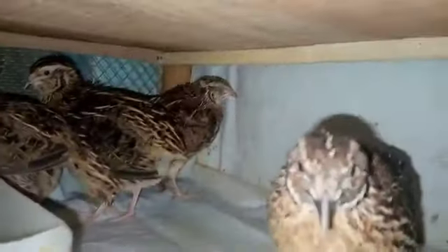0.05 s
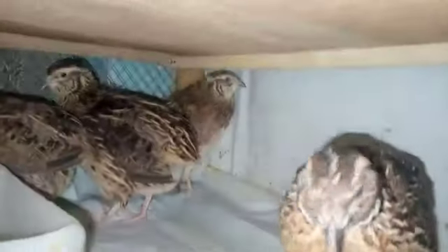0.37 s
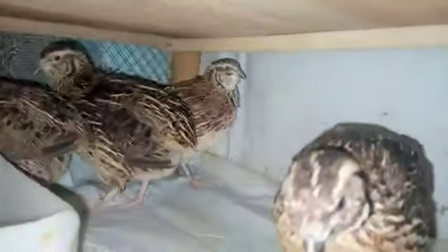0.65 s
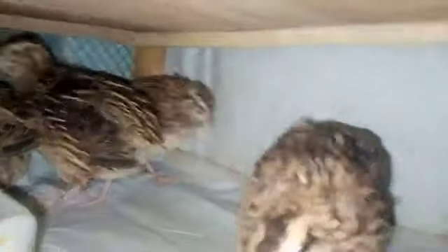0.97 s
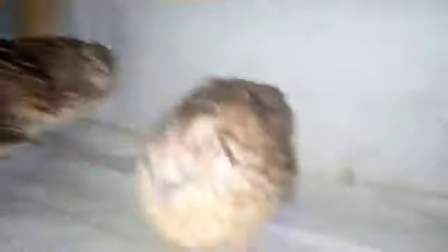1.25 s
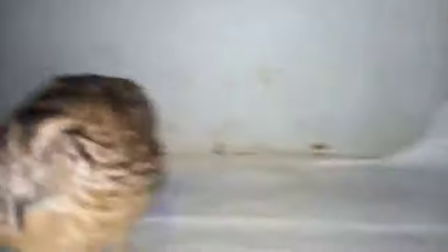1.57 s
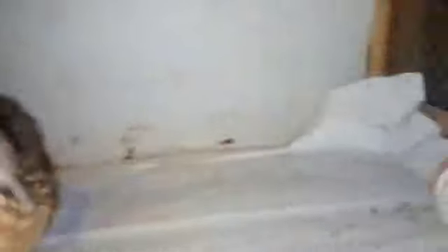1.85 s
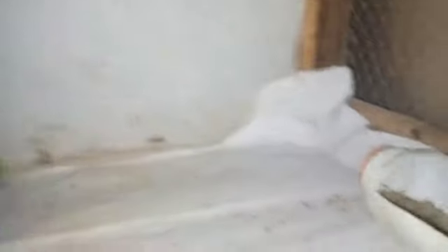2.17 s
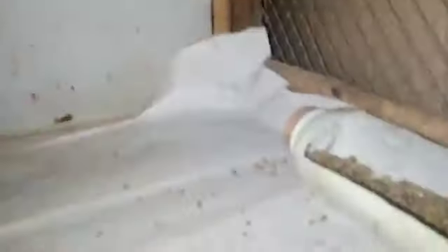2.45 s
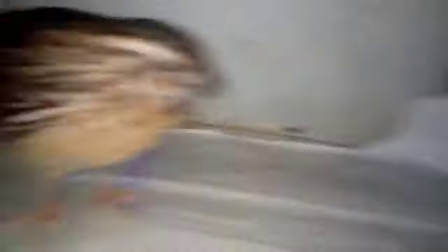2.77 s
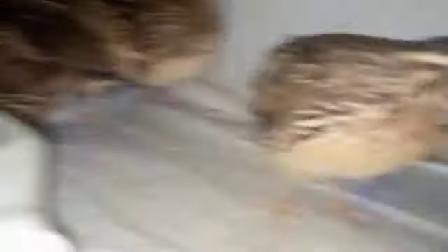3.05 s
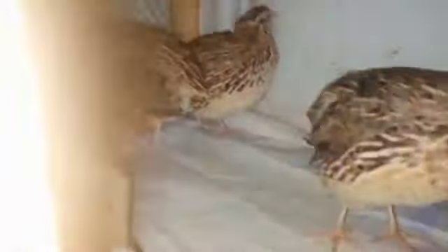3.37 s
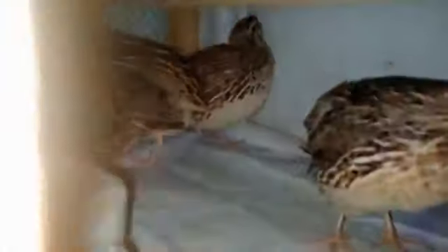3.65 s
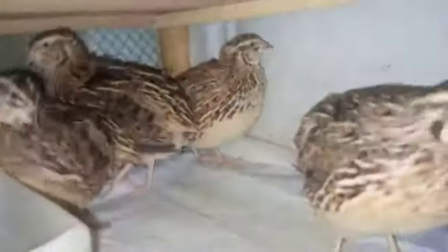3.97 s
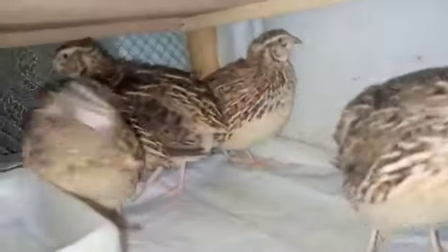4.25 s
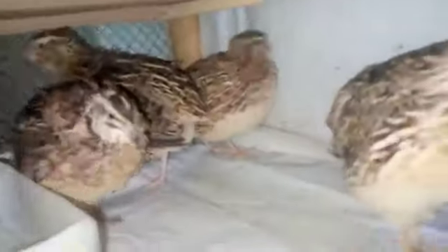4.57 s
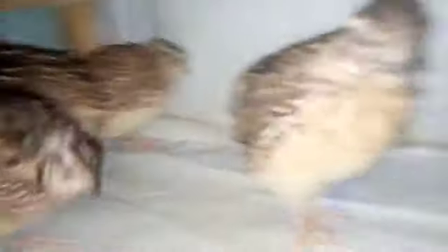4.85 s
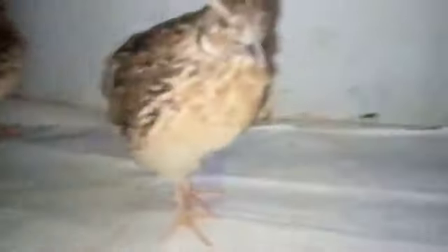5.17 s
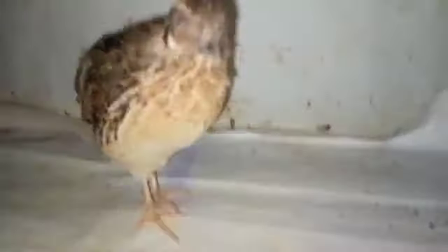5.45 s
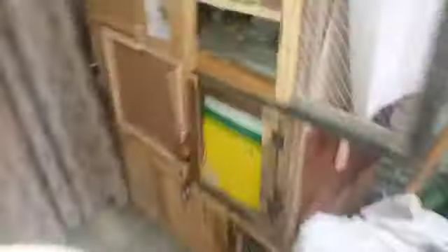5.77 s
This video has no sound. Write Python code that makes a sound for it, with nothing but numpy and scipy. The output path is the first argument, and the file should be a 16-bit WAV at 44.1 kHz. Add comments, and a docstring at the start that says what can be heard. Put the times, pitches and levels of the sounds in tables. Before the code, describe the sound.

Chicks give high, falling peeps indoors behind the scuffs, thuds and bowl taps of shuffling quail and the pops of a hand-held phone.

```python
"""A wooden hutch: quail shuffle about, a hand-held phone among them.
The phone's case pops in stick-slip, rubs, rumbles and judders in the hand. Close by, feet and
feathers scuff the liner, the floor board thuds, beaks and claws knock a metal bowl, and one bird
gives a low coo. Across the room chicks tweet and peep, each peep a falling glide from both sides
of the syrinx."""
import sys
import numpy as np
from scipy import signal
from scipy.fft import rfft, irfft
from scipy.io import wavfile

SR = 44100
rng = np.random.default_rng(int(sys.argv[2]) if len(sys.argv) > 2 else 0)


def int16_out(signal):
    """Quantize to a 16-bit WAV file."""
    q = np.round(np.clip(np.atleast_2d(signal).T, -1, 1) * 32767)
    wavfile.write(sys.argv[1], SR, q.astype(np.int16))


N = 260631
TIME_S = np.arange(N) / SR

# handling rumble: time_s, level_db
RUMBLE_LEVELS = [(0.0, -48), (0.81, -56.5), (1.12, -48), (1.68, -56), (2.11, -43), (2.32, -54.5),
                 (4.92, -53.5), (5.91, -63.5)]
# rubbing, three registers: time_s, body_db, rasp_db, hiss_db
RUSTLE_LEVELS = [(0, -57.5, -55.5, -54.5), (.35, -45.5, -56, -62.5), (.43, -47, -52, -49),
                 (.56, -70, -57.5, -57), (.62, -71.5, -76, -82), (.83, -62, -78, -74.5),
                 (.93, -53, -61, -57), (1.09, -48.5, -53.5, -47.5), (1.3, -51.5, -53, -55.5),
                 (1.52, -50.5, -56, -57.5), (1.7, -56.5, -47, -46.5), (1.79, -64, -55, -50),
                 (1.861, -45.5, -39, -42), (1.95, -72, -58, -61), (2.01, -59, -60, -38.5),
                 (2.05, -42, -39.5, -74), (2.15, -37, -39.5, -50), (2.36, -60, -53, -55),
                 (2.6, -57.5, -50, -52.5), (2.72, -50.5, -52.5, -52), (2.9, -58, -46.5, -45.5),
                 (2.98, -61.5, -60, -63), (3.14, -73.5, -71.5, -85), (3.44, -64.5, -71.5, -68.5),
                 (3.74, -72, -67, -64), (3.83, -47.5, -72, -49.5), (3.98, -49, -51, -59),
                 (4.2, -60.5, -65, -56), (4.36, -52.5, -62.5, -45.5), (4.58, -63.5, -75, -70),
                 (4.73, -63.5, -66, -58), (4.86, -48, -59, -45), (5.06, -55.5, -58, -57),
                 (5.22, -74, -45, -66), (5.37, -73, -48.5, -75), (5.46, -58, -40.5, -46.5),
                 (5.62, -62.5, -46, -47), (5.74, -75, -56, -46), (5.91, -44.5, -46, -54)]
# feet and feathers: start_s, length_s, level_db, brightness (0 body, 1 rasp, 2 hiss)
FOOT_SCUFFS = [(0.32, 0.023, -36.5, 1.37), (0.345, 0.035, -37.5, 2.05), (.407, 0.015, -37, 1.7),
               (.537, 0.058, -45, 0.051), (0.902, 0.007, -42.5, 2.34), (2.17, 0.031, -49, 0.36),
               (2.495, 0.0059, -41.5, 2.1), (2.567, 0.0079, -43, 0.97), (2.1015, 0.0087, -22, 1.21),
               (2.664, 0.011, -33, 1.84), (3.366, 0.0094, -54.5, 0.65), (3.431, 0.019, -51.5, 1.06),
               (3.504, .025, -59.5, 1.24), (3.668, 0.027, -56.5, 0.61), (3.861, 0.03, -43, 0.43),
               (4.322, 0.051, -36.5, 2.58), (4.377, 0.058, -38.5, 2.32), (4.462, 0.032, -33, 2.6),
               (4.8, 0.045, -40.5, 1.52), (4.878, 0.058, -37.5, 1.84), (4.929, 0.036, -22.5, 1.08),
               (4.992, 0.031, -33, 1.1), (5.089, 0.038, -43.5, 0.67), (5.758, 0.041, -43, 0.95),
               (5.841, 0.044, -40, 0.51), (5.87, 0.036, -34.5, 2.6)]
# hand sliding on the phone: start_s, length_s, level_db
HAND_SLIDES = [(0.711, 0.039, -48.5), (0.998, 0.27, -47.5), (1.152, 0.39, -54.5), (1.45, 0.12, -47.5),
               (1.66, 0.63, -51.5), (2.563, 0.22, -59.5), (2.815, 0.16, -55.5), (5.007, 0.1, -54)]
# spectra of rumble, rubbing registers, skin and case: freq_hz, gain_db
RUMBLE_EQ = [(25, -17.5), (50, 2.5), (80, 10), (170, 6.5), (260, -21.5), (500, -59.5)]
BODY_EQ = [(120, -22.5), (210, 0), (350, 1.5), (550, -4.5), (820, -7), (1100, -42.5), (2500, -44)]
RASP_EQ = [(450, -18), (950, 2), (1400, 3.5), (2200, 2), (3200, 0), (4800, -2.5), (7000, -17), (11000, -55)]
HISS_EQ = [(1500, -32), (3000, -7), (5500, -2.5), (6700, 2.5), (8000, -12), (10000, -19.5), (15000, -32)]
SKIN_EQ = [(4000, -16), (6700, 0.5), (8500, -5), (11000, -12), (13500, -6.5), (14900, 2.5), (15400, -36),
           (16000, -52)]
CASE_EQ = [(100, 0.5), (1000, -3), (2500, 0), (4500, -3), (6800, 4), (8500, -9.5), (12000, -23.5),
           (15000, -11), (16500, -15)]
# stick-slip runs on the case: start_s, slip_count, gap_ms, level_db, release_ms
SLIP_RUNS = [(.0098, 1, 0, -11.5, 0.058), (0.0858, 2, 23, -17.5, 0.072), (0.1467, 2, 43, -8, 0.054),
             (0.2186, 2, 25.5, -15.5, 0.14), (0.293, 2, 20, -13.5, 0.094), (1.3598, 1, 0, -22, 1.7),
             (1.3912, 3, 30.5, -14.5, .9), (1.493, 1, 0, -22, 1.1), (1.676, 2, 12, -20, 0.48),
             (1.698, 3, 7, -17, 0.32), (1.7197, 2, 20.5, -15, 0.84), (1.812, 1, -4, -2.5, 0.03),
             (1.894, 2, 26.5, -16.5, 0.98), (1.9452, 4, 22, -10.5, .2), (2.0373, 2, 24.5, -12.5, 0.079),
             (2.129, 1, 0, -15.5, 0.81), (2.2956, 2, 16, -13.5, 0.72), (2.333, 1, 0, -15, 1.4),
             (2.666, 1, 0, -17.5, 7), (3.946, 1, 0, -6.5, 0.038), (4.0303, 2, 29.5, -5.5, 0.083),
             (4.096, 2, 31.5, -10.5, 0.067), (4.805, 1, 0, -15.5, 0.43), (4.9293, 1, 0, -5, 0.16),
             (4.991, 1, 0, -1.5, 0.13)]
# modes of the hollow case and the loaded bowl: freq_hz, width_hz, gain_db
PHONE_MODES = [(249, 67, -1), (694, 216, 0.5), (1510, 280, -5)]
BOWL_MODES = [(355, 64, 7), (475, 81, 14), (700, 83, 6.5), (1760, 54, -35), (2720, 150, -3.5),
              (3400, 70, -7), (4460, 81, -6), (6600, 540, -7.5)]
# floor thuds: start_s, level_db, pitch_hz, t60_s
FLOOR_BUMPS = [(.203, -27, 390, .05), (0.327, -33, 167.7, 0.19), (0.492, -18, 319, 0.042),
               (.517, -22, 716, 0.032), (1.048, -29.5, 327, 0.15), (1.722, -35, 285, 0.099),
               (2.11, -25.5, 216, 0.23), (3.061, -34, 88, 0.14), (2.921, -28.5, 347, 0.025),
               (2.667, -12.5, 124, 0.043), (3.877, -27, 260, 0.023), (4.635, -20, 335, 0.025),
               (4.949, -13.5, 154, 0.031)]
# bowl contacts: start_s, level_db, tilt_db_per_octave (hardness)
BOWL_KNOCKS = [(0.444, -32, -5), (.492, -28.5, -0.5), (.516, -19.5, 4.5), (0.738, -36, 4.5),
               (1.011, -37.5, -2.5), (2.172, -26, 5.5), (2.931, -34.5, 4), (3.773, -41, 7.5),
               (3.862, -30.5, 7), (4.077, -41, 27), (4.515, -34, 36), (4.629, -37, 47), (4.654, -34.5, 28),
               (4.7065, -31.5, 14), (5.408, -31.5, 2.5), (5.508, -25, 1.5)]
# contact length by hardness: tilt_db_per_octave, contact_ms
CONTACT_TIMES = [(5, 10.2), (-1, 2.7)]
# tweets, finger judder, coo: start_s, length_s, open_hz, middle_hz, close_hz, level_db
TWEET_ARCS = [(.15, 0.098, 4780, 3980, 3520, -52), (.62, 0.075, 4400, 4170, 3900, -76),
              (.925, 0.13, 4500, 3930, 3610, -54), (1.775, 0.15, 4220, 3870, 3630, -44),
              (2.975, 0.034, 3100, 2100, 2300, -59), (3.183, 0.029, 3440, 2895, 2560, -44),
              (3.255, 0.052, 4000, 3050, 2850, -55), (3.80, 0.036, 3100, 2460, 2020, -47),
              (4.755, 0.064, 1990, 3120, 3200, -49.5), (5.183, 0.074, 3790, 3520, 3360, -47.5)]
JUDDER_ARCS = [(1.047, .112, 174, 172, 168, -35)]
COO_ARCS = [(4.843, .066, 305, 258, 272, -36)]
# judder and coo partials: harmonic, level_db
JUDDER_HARMONICS = [(1, 12), (2, -6)]
COO_HARMONICS = [(2, 12.5), (3, 12.5), (4, -8), (5, -3)]
# falling peeps: start_s, length_s, open_hz, knee_hz, close_hz, level_db
PEEP_GLIDES = [(1.082, 0.15, 5250, 4010, 2810, -42.5), (1.172, 0.1, 4390, 4150, 4020, -44.5),
               (1.489, .15, 5110, 4000, 2900, -43.5), (1.559, 0.13, 4910, 4080, 2540, -39.5),
               (2.0, 0.14, 5100, 4040, 2420, -41), (2.436, 0.21, 5046, 3853, 2340, -37.5),
               (2.481, 0.19, 4910, 4050, 3630, -39.5), (2.855, 0.074, 4690, 4120, 3200, -44),
               (2.952, 0.24, 5275, 3970, 2450, -47), (2.985, 0.24, 5640, 4080, 3500, -52.5),
               (3.286, 0.17, 5190, 4190, 2670, -47.5), (3.605, 0.19, 5190, 4190, 3630, -49),
               (3.715, 0.19, 5010, 4090, 2730, -44.5), (4.082, 0.11, 5100, 4240, 3600, -45.5),
               (4.46, 0.13, 4220, 3660, 2530, -48), (4.505, 0.19, 5050, 4280, 3250, -48),
               (5.026, 0.258, 5020, 4010, 2710, -37), (5.493, 0.2, 4850, 4260, 3530, -35),
               (5.53, .16, 5640, 5050, 4700, -38), (5.692, 0.18, 5180, 4230, 4070, -38.5),
               (5.737, .2, 5090, 4380, 3500, -36)]


def undb(db):
    """Decibels to gain."""
    return 10 ** (np.asarray(db) / 20)


def unit(x):
    """Scale to rms 1."""
    return x / np.sqrt(np.mean(x ** 2) + 1e-20)


def add(track, start_s, x):
    """Mix x into the track."""
    i = max(int(start_s * SR), 0)
    track[i:i + len(x)] += x[:max(len(track) - i, 0)]


def ticks(length_s):
    """Sample times, s."""
    return np.arange(int(length_s * SR)) / SR


def stroke(length_s):
    """Rounded rise and fall."""
    return np.sin(np.pi * ticks(length_s) / length_s) ** .5


def walk(rate_hz, size):
    """Random wander: straight lines between unit normal draws."""
    points = rng.standard_normal(int(size * rate_hz / SR) + 2)
    return np.interp(np.arange(size) * rate_hz / SR, np.arange(len(points)), points)


def colour(x, eq):
    """Minimum-phase filter from (freq_hz, gain_db) points."""
    hz, db = np.transpose(eq)
    size = 2 ** 12
    bins_hz = np.maximum(np.fft.rfftfreq(size, 1 / SR), 1)
    gain = undb(np.interp(np.log(bins_hz), np.log(hz), db))
    cepstrum = irfft(np.log(gain))
    cepstrum[1:size // 2] *= 2
    cepstrum[size // 2 + 1:] = 0
    return signal.fftconvolve(x, irfft(np.exp(rfft(cepstrum))))[:len(x)]


def resonate(x, hz, width_hz):
    """One resonance, gain 1 at centre."""
    return signal.lfilter(*signal.iirpeak(hz, hz / width_hz, fs=SR), x)


def highpass(x, hz):
    """Second-order bass cut."""
    return signal.sosfilt(signal.butter(2, hz, "high", fs=SR, output="sos"), x)


def hand_rumble():
    """Low handling noise."""
    noise = unit(colour(rng.standard_normal(N), RUMBLE_EQ))
    return noise * undb(np.interp(TIME_S, *np.transpose(RUMBLE_LEVELS)) + 4)


def grains(size, spread_db, rate_hz):
    """Friction noise: strength jumps from slip to slip."""
    return unit(rng.standard_normal(size) * undb(spread_db * walk(rate_hz, size)))


def hutch(x, wall_db, t60_s=.03):
    """Direct sound plus boxy reflections off close walls."""
    lags_s = rng.uniform(.001, .014, size=9)
    echoes = undb(-60 * lags_s / t60_s)
    dulled = signal.lfilter([.5, .5], [1], x)
    out = x.copy()
    for lag_s, echo in zip(lags_s, echoes / np.linalg.norm(echoes)):
        add(out, lag_s, undb(wall_db) * echo * dulled)
    return out


def friction(eq, grain_db, patchy_db=4.5):
    """Tiny slips; band emphasis and wall resonances wander as the contact moves. Rms 1."""
    slips = grains(N, grain_db, rate_hz=700)
    bands_hz = 170 * 2 ** np.arange(0, 6.6, .5)
    patchy = sum(resonate(np.roll(slips, rng.integers(N)), hz, hz / 3.5) * undb(patchy_db * walk(35, N))
                 for hz in bands_hz)
    place = walk(3, N)
    boxy = sum(share * hutch(np.roll(patchy, rng.integers(N)), wall_db=-3)
               for share in (np.cos(place), np.sin(place)))
    return unit(colour(boxy, eq))


def pressure(register, bed_db, sway_db, focus_db=14.5):
    """Envelope of one rubbing register: swaying bed plus scuffs near it in brightness."""
    levels = np.array(RUSTLE_LEVELS)
    level_db = np.interp(TIME_S, levels[:, 0], levels[:, 1 + register])
    strength = undb(level_db + bed_db + sway_db * walk(60, N))
    for start_s, length_s, db, brightness in FOOT_SCUFFS:
        add(strength, start_s, undb(db - focus_db * (register - brightness) ** 2) * stroke(length_s))
    return strength


def rustle(loud_hiss_db=-40, scrape_hz=9600, scrape_width_hz=1700):
    """Sliding contact: dull body, dry rasp, hiss and a fine high sizzle."""
    body = pressure(0, bed_db=-1, sway_db=3)
    rasp = pressure(1, bed_db=-3, sway_db=2)
    hiss = pressure(2, bed_db=-.5, sway_db=1.5)
    # heard with loud hiss and hand slides, fades in quiet passages
    sizzle = undb(-17) * hiss * np.minimum(hiss / undb(loud_hiss_db), 1)
    for start_s, length_s, db in HAND_SLIDES:
        add(sizzle, start_s, undb(db) * stroke(length_s) ** 3)
    swells = undb(-10 + 4.5 * walk(23, N))
    band = resonate(rng.standard_normal(N), scrape_hz, scrape_width_hz)
    scrape = swells * unit(resonate(band, scrape_hz, scrape_width_hz))
    return (body * friction(BODY_EQ, grain_db=-1)
            + rasp * friction(RASP_EQ, grain_db=5.5)
            + hiss * friction(HISS_EQ, grain_db=7.5)
            + sizzle * (friction(SKIN_EQ, grain_db=.5) + scrape))


def case_pops(crackle_s=.0018, rebound_s=.0005):
    """The grip slips at an even pace: each pressure step leaks away, catches again, rings the case."""
    out, t = np.zeros(N), ticks(.027)
    for start_s, count, gap_ms, db, release_ms in SLIP_RUNS:
        for slip in range(round(count)):
            step = np.exp(-t * 1000 / release_ms)
            rebound = .7 * step * np.exp(-t / rebound_s)
            add(step, rebound_s * rng.uniform(.5, 2), rebound)
            crackle = undb(-22) * rng.standard_normal(len(t)) * np.exp(-t / crackle_s)
            detune = np.exp(.18 * rng.standard_normal())  # the grip retunes the case
            hollow = sum(undb(mode_db) * resonate(step, hz * detune, width_hz)
                         for hz, width_hz, mode_db in PHONE_MODES)
            gain = undb(db - 1.5 + 2 * rng.uniform(-1, 1))
            add(out, start_s + slip * gap_ms / 1000, gain * (step + hollow + crackle))
    return colour(highpass(out, hz=150), CASE_EQ)


def curved_tones(arcs, harmonics, waver, flutter_db=0):
    """Short, unsteady tones; pitch follows a parabola."""
    out = np.zeros(N)
    for start_s, length_s, open_hz, middle_hz, close_hz, db in arcs:
        u = ticks(length_s) / length_s
        hz = np.polyval(np.polyfit([0, .5, 1], [open_hz, middle_hz, close_hz], 2), u)
        phase = 2 * np.pi * np.cumsum(hz * (1 + waver * walk(264, len(u)))) / SR
        tone = sum(undb(part_db) * np.sin(round(k) * phase) for k, part_db in harmonics)
        flutter = undb(flutter_db * walk(263, len(u)))
        add(out, start_s, undb(db) * unit(tone * stroke(length_s) * flutter))
    return out


def chick_tweets():
    """Brief, nearly pure, fluttering whistles."""
    return curved_tones(TWEET_ARCS, [(1, -10), (2, -36)], waver=.016, flutter_db=4)


def room(x, t60_s=.17, gap_s=.004):
    """Diffuse tail of unit energy after a short gap."""
    t = ticks(.6)
    tail = rng.standard_normal(len(t)) * undb(-60 * t / t60_s) * (t > gap_s)
    return signal.fftconvolve(x, tail / np.linalg.norm(tail))[:N]


def floor_bumps(attack_s=.0012, overtone_ratio=2.2):
    """Hollow board thuds: lowest mode plus an overtone that dies twice as fast."""
    out, t = np.zeros(N), ticks(.17)
    for start_s, db, hz, t60_s in FLOOR_BUMPS:
        phase = 2 * np.pi * hz * t
        decay = undb(-60 * t / t60_s)
        board = decay * (np.sin(phase) + undb(-9) * decay * np.sin(overtone_ratio * phase))
        add(out, start_s, undb(db) * board * np.expm1(-t / attack_s))
    return out


def bowl_knocks():
    """Beaks and claws graze the bowl; hard contacts favour its high modes."""
    out, t = np.zeros(N), ticks(.08)
    for start_s, db, tilt_db in BOWL_KNOCKS:
        contact_ms = np.interp(tilt_db, *np.transpose(CONTACT_TIMES))
        age = t * 1000 / contact_ms
        envelope = np.minimum(age * 6, 1) * np.exp(-age ** .74)
        push = envelope * grains(len(t), spread_db=4, rate_hz=1500)
        detune = 1 + .05 * rng.uniform(-1.07, 1)  # feet and feed vary the load
        ring = sum(undb(mode_db + tilt_db * np.log2(hz / 2000)) * resonate(push, hz * detune, width_hz)
                   for hz, width_hz, mode_db in BOWL_MODES)
        scratch = undb(tilt_db - 17) * colour(push, CASE_EQ)
        knock = ring + scratch
        contact_power = np.sum(knock ** 2) / np.sum(age < 1)
        add(out, start_s, undb(db) * knock / np.sqrt(contact_power))
    return out


def finger_judder():
    """A finger judders on the case: a short, low buzz."""
    return curved_tones(JUDDER_ARCS, JUDDER_HARMONICS, waver=.035)


def whistle(hz, strain):
    """One side of the syrinx: a near sine; quaver in pitch and strength grows with strain."""
    quaver = .006 * strain * walk(800, len(hz))
    rasp = .4 * strain * walk(900, len(hz))
    phase = 2 * np.pi * np.cumsum(hz * (1 + quaver)) / SR
    return (1 + rasp) * (np.sin(phase) + undb(-35) * np.sin(2 * phase))


def chick_peeps(knee_share=.8, loudest_share=.83, second_ratio=1.11, attack_s=.025, release_s=.006):
    """Two-voiced whistles: start soft and clear, sag to a knee, swell, plunge hoarsely."""
    out = np.zeros(N)
    for start_s, length_s, open_hz, knee_hz, close_hz, db in PEEP_GLIDES:
        t = ticks(length_s)
        u = t / length_s
        sag = np.minimum(u / knee_share, 1) ** 2.2
        plunge = np.interp(u, [knee_share, 1], [0, 1])
        hz = open_hz + (knee_hz - open_hz) * sag + (close_hz - knee_hz) * plunge
        hz *= 1 + .007 * walk(70, len(t))
        strain = .5 + u ** 2
        first = whistle(hz, strain)
        second = undb(-14) * whistle(second_ratio * hz, strain)
        hoarse = undb(-15) * 2 * u * first * walk(1600, len(t))  # noise sidebands
        fades = np.clip(np.minimum(t / attack_s, (length_s - t) / release_s), 0, 1)
        effort = undb(db - 16 * np.abs(u - loudest_share) + 3 * walk(132.2, len(t)))
        add(out, start_s, fades * effort * (first + second + hoarse))
    return out


def quail_coo():
    """One low, wavering call: overtones without the fundamental."""
    return curved_tones(COO_ARCS, COO_HARMONICS, waver=.04)


def scene():
    """Chicks far off, echoing in the room; the rest close. Mono."""
    chicks = chick_peeps() + chick_tweets()
    coo = undb(-3) * quail_coo()
    judder = undb(-3) * finger_judder()
    near = bowl_knocks() + floor_bumps() + undb(.5) * rustle() + coo
    hand = case_pops() + hand_rumble() + judder
    far = undb(-1.5) * hutch(chicks, wall_db=-5) + undb(-5.5) * room(chicks)
    return (far + near + hand)[None]


def record(dry):
    """The phone thins the deep bass and cuts the top."""
    top_hz = 15700
    lowpass = signal.ellip(8, .2, 70, top_hz, fs=SR, output="sos")
    return signal.sosfilt(lowpass, highpass(dry, hz=45))


dry = scene()
out = record(dry)
int16_out(out)
```